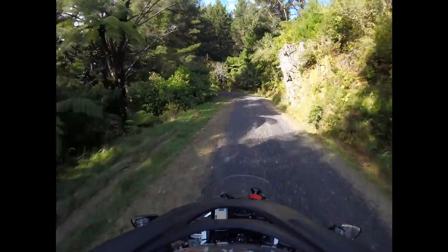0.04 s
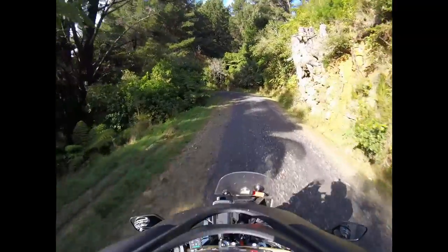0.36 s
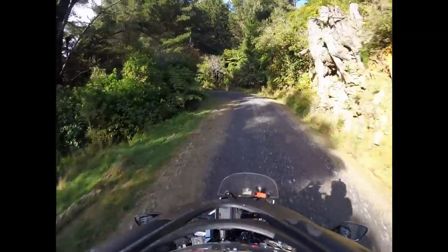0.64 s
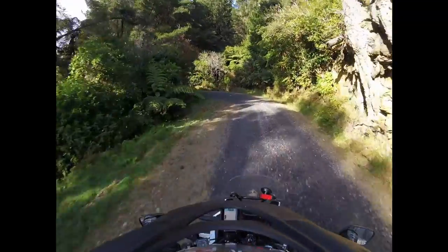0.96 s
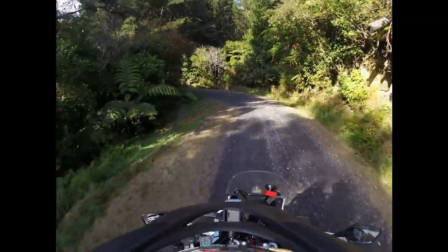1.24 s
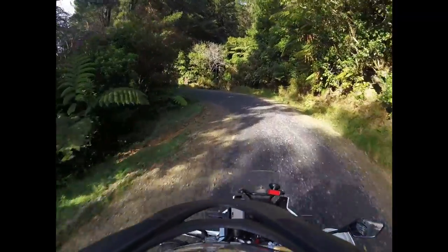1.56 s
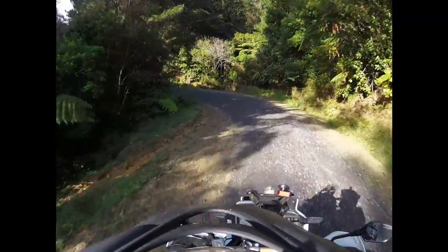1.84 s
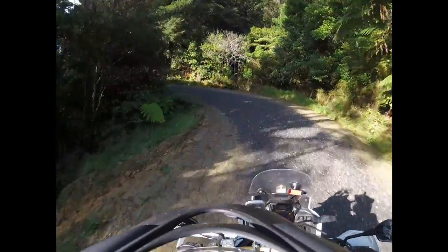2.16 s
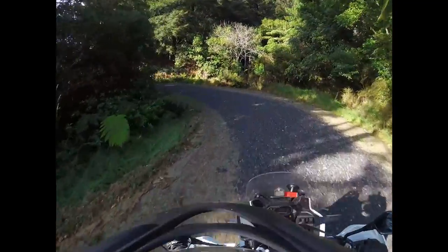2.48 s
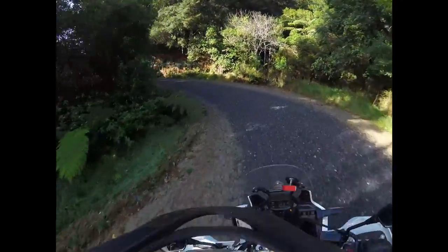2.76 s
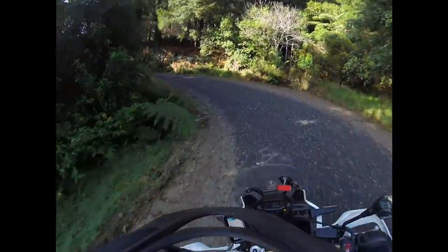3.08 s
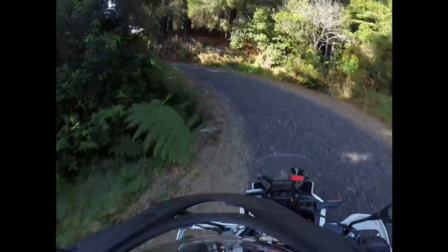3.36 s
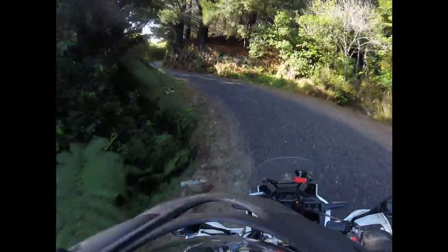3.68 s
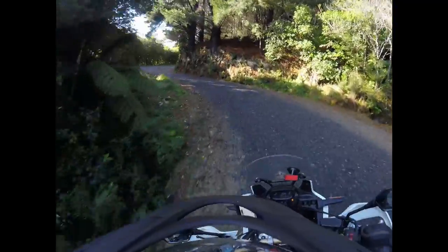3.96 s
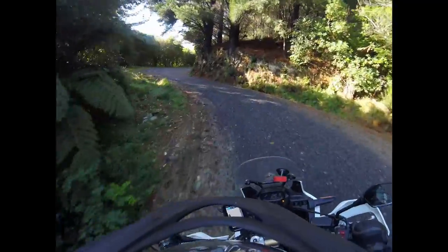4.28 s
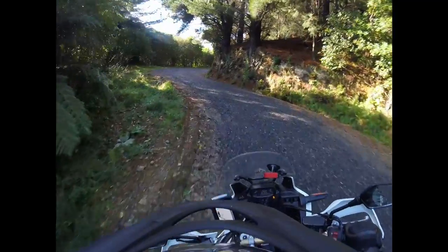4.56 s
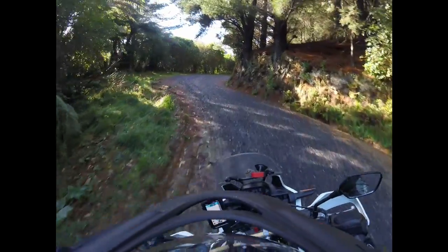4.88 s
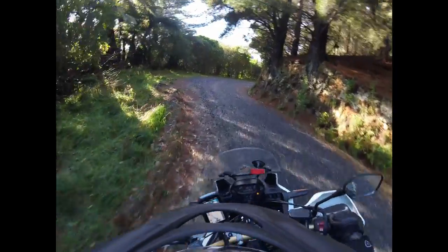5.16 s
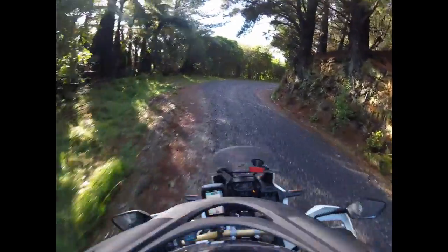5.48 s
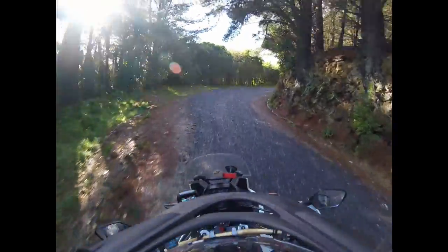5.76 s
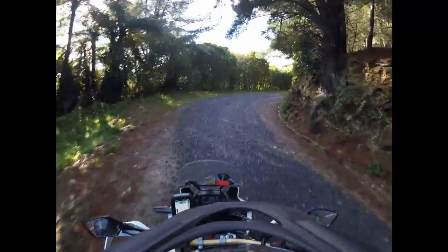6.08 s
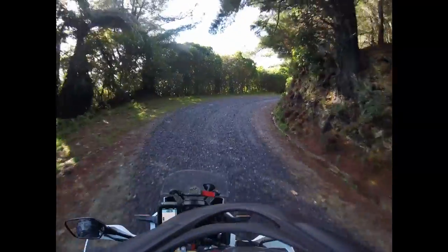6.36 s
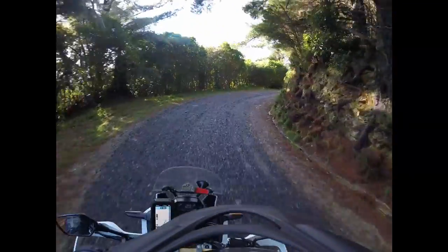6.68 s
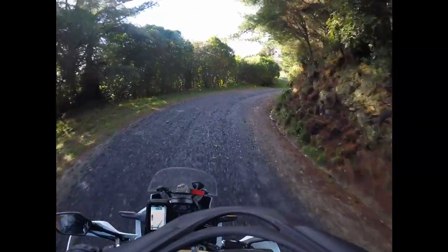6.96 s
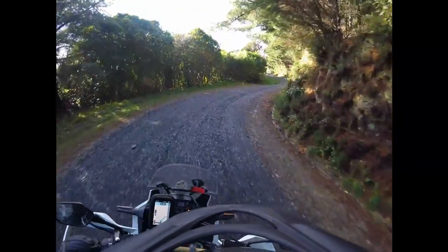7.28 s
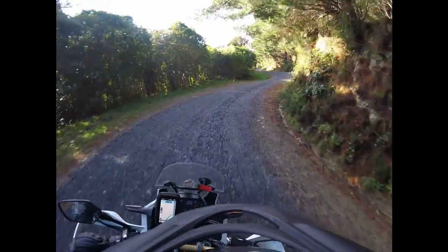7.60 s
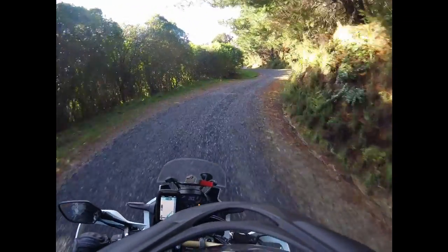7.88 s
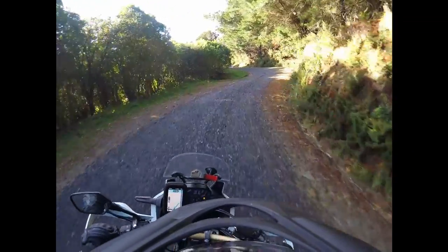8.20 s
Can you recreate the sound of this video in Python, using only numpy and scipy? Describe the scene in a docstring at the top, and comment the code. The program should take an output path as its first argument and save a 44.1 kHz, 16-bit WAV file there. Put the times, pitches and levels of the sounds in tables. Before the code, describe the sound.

A twin-cylinder motorcycle coasts along a gravel road, heard from the rider's seat, its low exhaust burbling as the revs sink under a faint gear whine. The throttle opens with a few dull chain slaps and the engine throbs and growls. The revs swell briefly as gravel sprays and stones ping off metal, then settle into a steady pull. Tyres crunch and wind rumbles on the microphone throughout.

```python
"""Motorcycle on a gravel bend

A V-twin coasts into a bend and pulls away, heard from the rider's seat. The exhaust burbles while
coasting; as the throttle opens the chain slaps, the airbox throbs and the intake hisses. Gears whine,
tyres crunch, stones ping, the chassis knocks now and then and wind buffets the microphone."""
import sys
import numpy as np
from scipy import signal
from scipy.fft import rfft, irfft
from scipy.io import wavfile
from scipy.ndimage import uniform_filter1d, minimum_filter1d

SR = 44100
rng = np.random.default_rng(int(sys.argv[2]) if len(sys.argv) > 2 else 0)


def generate_wav(sig):
    """Save sig (samples, or channels by samples) to the path in sys.argv[1] as 16-bit PCM at SR."""
    pcm = np.round(np.clip(np.atleast_2d(sig).T, -1, 1) * 32767).astype(np.int16)
    wavfile.write(sys.argv[1], SR, pcm)


N = 362943
TIME = np.arange(N) / SR
CRUISE_HZ = 16.3  # engine cycles per second; a cycle is two turns of the crank


# A level rule lists: dB with the throttle shut, half open and wide open, then dB added
# per doubling of cruising speed and dB added when the engine labours.
EXHAUST_RULE = (-12.5, -18, -34, 5.5, 1.5)
# The silencer's tone. Each row: frequency in Hz, relative level in dB.
SILENCER_TONE = [(10, -38.5), (24, -14), (34, 5), (49, 9.5), (65, 4.5), (82, 1), (100, -7.5), (128, -15.5),
                 (175, -28), (250, -32), (400, -38), (9000, -124)]
def exhaust():
    """Puffs of gas ring the silencer; this burble leads while the throttle is shut."""
    puffs = strokes(phase=0.375, second=0.64, uneven_db=1.2, jitter=0.0026, steady=True)
    return drive(EXHAUST_RULE) * with_crank(colour(puffs, SILENCER_TONE))


# Level rules for the four intake sounds, laid out like the exhaust's.
GULP_RULE = (-25.5, -11, -17.5, 6.5, -3)
SLAM_RULE = (-49.5, -28.5, -22.5, 1.5, 4.5)
RASP_RULE = (-45, -44.5, -11.5, -5, -0.5)
HISS_RULE = (-71.5, -44, -34.5, 9.5, 2.5)
# Their tones. Each row: frequency in Hz, relative level in dB.
AIRBOX_TONE = [(12, -26), (30, -8.5), (44, -9.5), (54, -7), (68, -1), (82, -3.5), (100, -4.5), (120, -8),
               (145, -24), (200, -18), (400, -49.5), (9000, -126)]
SNORKEL_TONE = [(50, -26.5), (115, -28), (150, -3.5), (178, 3), (200, 3.5), (228, -0.5), (270, -6),
                (315, -21), (400, -19.5), (700, -29.5), (2500, -58), (12000, -105)]
RASP_TONE = [(350, -22), (700, 6), (1050, 1), (1450, -1), (2000, -4.5), (4000, -18.5), (10000, -59)]
HISS_TONE = [(2500, -22.5), (4400, -17), (5000, -4), (5480, 1), (6050, -6.5), (6700, -6.5), (7600, -12),
             (9800, -12.5), (10600, -20), (11500, -33), (14300, -32), (15500, -40)]
def intake():
    """Gulps ring the airbox, shutting valves ring its inlet pipe, and air rushes past the throttle."""
    suction = -strokes(phase=0.343, second=1.05, uneven_db=0.7, jitter=0.0015)
    gulps = drive(GULP_RULE) * colour(suction, AIRBOX_TONE)
    closings = strokes(phase=0.42, second=1.44, uneven_db=3.0, jitter=0.0053, steady=True)
    slams = drive(SLAM_RULE) * with_crank(colour(closings, SNORKEL_TONE))
    rasp = drive(RASP_RULE) * colour(noise() * throb(phase=0.36, depth=3, second=2.24), RASP_TONE)
    air = colour(noise() + 0.5 * grit(per_s=2100, spread_db=4.0), HISS_TONE)
    hiss = drive(HISS_RULE) * air * throb(phase=0.29, depth=0.3)
    return gulps + slams + rasp + hiss


# The intake's bark. Each row: time in seconds, level in dB.
BARK_LEVELS = [(2.6, -36), (3.0, -18), (4.3, -24), (4.65, -16.5), (5.17, -16.5), (5.28, -26), (5.43, -17),
               (6.05, -23.5), (6.25, -28), (7.3, -26.5), (8.23, -23)]
def bark():
    """Under load each gulp starts with a rising whoop; the nearer cylinder's is much harder."""
    hits = strokes(phase=0.2845, second=3.9, uneven_db=1.0, jitter=0.0024, steady=True)
    whoops = glides(hits, from_hz=72, to_hz=376, length_s=0.01135, skew=0.76)
    return amp(curve(BARK_LEVELS)) * with_crank(whoops)


# The chug of the firings. Each row: time in seconds, level in dB.
CHUG_LEVELS = [(2.6, -45), (3.1, -30.5), (3.6, -36.5), (3.85, -28), (4.6, -32), (5.05, -22), (5.25, -43),
               (5.5, -33), (7.2, -42.5), (7.95, -28.5), (8.23, -50)]
def chug():
    """Each firing under load rings the engine with a short falling note."""
    hits = strokes(phase=0.115, second=0.68, uneven_db=2.5, jitter=0.0065)
    return amp(curve(CHUG_LEVELS)) * glides(hits, from_hz=559.7, to_hz=284, length_s=0.0226, skew=0.7)


# The growl's loudness. Each row: time in seconds, level in dB.
GROWL_LEVELS = [(2.5, -56), (3.0, -33.5), (3.9, -29.5), (5.1, -38), (5.9, -31), (7.1, -34), (7.98, -24),
                (8.23, -33.5)]
# Its tone. Each row: frequency in Hz, relative level in dB.
GROWL_TONE = [(100, -49), (200, -2), (250, -7), (290, -32), (343, 0), (360, 11), (385, -1), (440, -1.5),
              (485, -19.5), (560, -33), (1000, -51.8), (9000, -110.2)]
def growl():
    """Under throttle the firings make the bike ring at a few pitches."""
    hits = strokes(phase=0.1618, second=0.63, uneven_db=2, jitter=0.0063)
    return amp(curve(GROWL_LEVELS)) * colour(hits, GROWL_TONE)


# Level rule for the engine cases, laid out like the exhaust's.
CLATTER_RULE = (-34.5, -29, -24, 20.5, 4.5)
# Their tone. Each row: frequency in Hz, relative level in dB.
CASE_TONE = [(60, -21), (140, -12.5), (210, -10), (265, 4), (315, -5.5), (355, -2.5), (390, -4.5),
             (440, 1.5), (520, -4.5), (650, -14.5), (1200, -25), (1900, -31), (2800, -32.5), (5000, -45),
             (14000, -91)]
def clatter():
    """Firings and valve gear shake the engine cases, in deeper surges under load."""
    depth = 0.087 + 0.59 * throttle() + 0.62 * labouring()
    shaking = noise() * throb(phase=0.13, depth=depth, second=0.93)
    blows = unit(strokes(phase=0.14, second=0.3, uneven_db=1.5, jitter=0.0022))
    return drive(CLATTER_RULE) * colour(shaking + 0.16 * blows, CASE_TONE)


# Level rules for the tick and the rap, laid out like the exhaust's.
TICK_RULE = (-58.5, -56, -41, -5, 2)
RAP_RULE = (-68, -54.5, -36, -8, -21)
# Their tones. Each row: frequency in Hz, relative level in dB.
TICK_TONE = [(1200, -37), (1900, -14.5), (2180, -11.5), (2330, -4), (2500, -15), (2900, -17.5), (4000, -26),
             (9000, -50), (15000, -80)]
RAP_TONE = [(700, -24.5), (1700, -3), (2700, 3.5), (3800, -1), (6000, -11), (9000, -20.5), (14000, -52.5)]
def ticks(tick_s=0.0035, rap_s=0.0052):
    """Firing gives both cylinder heads a dry rap, and mainly one a metallic tick."""
    def rattle(hits, decay_s, tone):
        """A puff of noise dies away after each hit."""
        fades = signal.lfilter([1], [1, -np.exp(-1 / (decay_s * SR))], hits)
        return colour(fades * noise(), tone)
    tick = rattle(strokes(phase=0.15, second=0.39, uneven_db=4.5, jitter=0.0038), tick_s, TICK_TONE)
    rap = rattle(strokes(phase=0.12, second=1.0, uneven_db=3.0, jitter=0.0036), rap_s, RAP_TONE)
    return drive(TICK_RULE) * tick + drive(RAP_RULE) * rap


# Gear whine, strongest when coasting or cruising. Each row: time in seconds, level in dB.
WHINE_LEVELS = [(0, -45.5), (.8, -45.5), (0.98, -40.5), (1.35, -48), (1.62, -43.5), (2.2, -41), (2.42, -46),
                (4.2, -50), (5.65, -42), (5.9, -42.5), (6.3, -44), (7, -42), (8.23, -43.5)]
def whine(teeth_per_cycle=91, width_hz=110, overtone_db=-14):
    """Meshing gear teeth give a fuzzy whistle that follows engine speed."""
    mesh = 2 * np.pi * teeth_per_cycle * cycles()
    note = drift(width_hz) * np.cos(mesh) + drift(width_hz) * np.sin(mesh)
    overtone = drift(4 * width_hz) * np.cos(2 * mesh) + drift(4 * width_hz) * np.sin(2 * mesh)
    return amp(curve(WHINE_LEVELS)) * (note + amp(overtone_db) * overtone)


# Level rules for the tyres, laid out like the exhaust's.
ROAR_RULE = (-38, -37.5, -25, 15, 6)
CRUNCH_RULE = (-49.5, -53.5, -45, -0.5, 2)
# Their tones. Each row: frequency in Hz, relative level in dB.
ROAR_TONE = [(200, -11), (500, 6.5), (750, -2), (1100, -5.5), (1600, -5), (2300, -12), (4500, -24.5),
             (10000, -65.5), (15000, -75)]
CRUNCH_TONE = [(600, -9.5), (1500, -9), (2200, -5.5), (3200, -6.5), (4300, -12.5), (5800, -5), (7200, -10),
               (8500, -16.5), (10500, -26.5), (12000, -30), (15000, -42)]
# Loose gravel leaving the bend. Each row: time in seconds, change in crunch in dB.
LOOSE_GRAVEL = [(4.4, -2.5), (4.85, 9.5), (5.65, -5), (6.1, 9), (6.16, -5)]
def tyres(roar_clumps_db=1.0, crunch_clumps_db=0.2):
    """Rolling tyres roar and stones grind under the tread, more when the rear tyre digs in."""
    roar = colour(noise() + 0.4 * grit(per_s=790, spread_db=2.0), ROAR_TONE)
    crunch = colour(noise() + grit(per_s=2300, spread_db=0.5), CRUNCH_TONE)
    roar_gain = drive(ROAR_RULE) * amp(roar_clumps_db * drift(40))
    crunch_gain = drive(CRUNCH_RULE) * amp(curve(LOOSE_GRAVEL) + crunch_clumps_db * drift(58))
    return roar_gain * roar + crunch_gain * crunch


# Thrown gravel. Each row: start in seconds, level in dB.
GRAVEL_SPRAYS = [(4.824, -35.5), (5.035, -44), (5.101, -37), (5.358, -39), (6.759, -54)]
def sprays(rise_s=0.013):
    """The rear tyre throws gravel in short bursts that swell and die away."""
    t, bursts = np.arange(SR // 5) / SR, np.zeros(N)
    for start, db in GRAVEL_SPRAYS:
        add(bursts, start, amp(db) * t / rise_s * np.exp(1 - t / rise_s))
    return bursts * colour(noise(), CRUNCH_TONE)


# Short dull knocks. Each row: start in seconds, peak level in dB, ring in Hz.
KNOCKS = [(1.257, -10.5, 313), (2.665, -21, 650), (2.749, -14.5, 615), (2.838, -15.5, 577),
          (2.921, -14.5, 540), (2.988, -11.5, 470), (3.29, -18, 810), (3.557, -21, 700), (6.675, -9.5, 430),
          (6.761, -12, 720), (7.971, -16, 330)]
def knocks(decay_s=0.0074):
    """The chain slaps as the throttle opens; elsewhere the chassis gives a few single knocks."""
    t, out = np.arange(SR // 10) / SR, np.zeros(N)
    for start, db, hz in KNOCKS:
        tone = [(hz / 6, -15), (hz / 2, 0), (hz, 0), (hz * 2, -12), (hz * 5, -36), (hz * 20, -70)]
        knock = colour(noise(len(t)) * np.exp(-t / decay_s), tone)
        add(out, start, amp(db) * knock / abs(knock).max())
    return out


# Stone strikes. Each row: start in seconds, peak level in dB, ring in Hz.
STONE_HITS = [(0.313, -33, 4840), (0.7104, -30, 5230), (3.091, -37, 4640), (5.1023, -26.5, 6400),
              (5.1047, -16, 7160), (5.1795, -19, 6440)]
def stones(decay_s=0.0019):
    """Flung stones ping off metal."""
    t, out = np.arange(SR // 20) / SR, np.zeros(N)
    for start, db, hz in STONE_HITS:
        tone = [(hz / 2, -18), (hz, 0), (hz * 1.3, -6), (hz * 1.8, -34)]
        ping = colour(noise(len(t)) * np.exp(-t / decay_s), tone)
        add(out, start, amp(db) * ping / abs(ping).max())
    return out


# Gusts. Each row: time in seconds, level in dB.
GUSTS = [(0, -17), (2.5, -17), (3.2, -17), (4.3, -15.5), (4.7, -24), (5.65, -23), (6.1, -17), (6.35, -15),
         (6.55, -17), (7.4, -19.5), (8.23, -22)]
# The wind's tone. Each row: frequency in Hz, relative level in dB.
WIND_TONE = [(8, -23), (25, -2), (48, -3), (64, -4.5), (95, -4), (130, -8.5), (180, -13.5), (250, -14),
             (330, -29), (700, -45), (3000, -80.5), (14000, -110)]
def wind(waver_db=1.25):
    """Lumpy air pressure rumbles on the microphone."""
    return amp(curve(GUSTS) + waver_db * drift(1.26)) * colour(noise(), WIND_TONE)


# The rider coasts, opens up, lifts briefly, then cruises. Each row: time in seconds, opening 0 to 1.
THROTTLE_MOVES = [(2.55, 0), (3.02, 0.41), (3.5, 0.46), (3.85, 0.49), (4.65, 0.58), (5.12, 0.73),
                  (5.29, 0.5), (5.4, 0.65), (6.0, 0.55), (6.25, 0.47), (7.3, 0.5), (8.0, 0.58),
                  (8.23, 0.56)]
def throttle():
    """How far the throttle is open."""
    return np.clip(curve(THROTTLE_MOVES), 0, 1)


# Engine speed. Each row: time in seconds, cycles per second.
ENGINE_SPEED = [(0.0, 21.124), (0.76, 17.719), (1.01, 21.036), (1.69, 17.568), (2.36, 14.856),
                (2.86, 13.468), (2.99, 14.328), (3.22, 13.505), (4.45, 14.484), (4.76, 15.267),
                (5.01, 19.106), (5.26, 14.737), (5.44, 16.627), (5.64, 15.573), (5.73, 16.43),
                (6.18, 16.11), (7.37, 16.225), (8.23, 17.537)]
def cycles():
    """Engine cycles turned so far."""
    return np.cumsum(curve(ENGINE_SPEED)) / SR


def labouring(full_hz=14.05, free_hz=15.35):
    """0 when the engine spins freely, 1 when it labours at low speed."""
    return np.clip((free_hz - curve(ENGINE_SPEED)) / (free_hz - full_hz), 0, 1)


def drive(rule):
    """Turns a level rule into a gain that follows throttle and engine speed."""
    shut, half, wide, per_doubling, labour = rule
    throttle_db = np.interp(throttle(), [0, 0.5, 1], [shut, half, wide])
    speed_db = per_doubling * np.log2(curve(ENGINE_SPEED) / CRUISE_HZ)
    return amp(throttle_db + speed_db + labour * labouring())


def strokes(phase, second, uneven_db, jitter, steady=False, gap=0.368):
    """Two limping pulses a cycle, one per cylinder; steady holds the rhythm at cruising speed."""
    # phase, gap and jitter are shares of a cycle; second is the second cylinder's strength
    turned = TIME * CRUISE_HZ if steady else cycles()
    pulses = np.zeros(N)
    for offset, strength in ((phase, 1), (phase + gap, second)):
        slip, force = rng.standard_normal((160, 2)).T
        at = np.searchsorted(turned, np.arange(len(slip)) + offset + jitter * slip)
        pulses[at[at < N]] += strength * amp(uneven_db * force[at < N])
    return pulses / np.sqrt(curve(ENGINE_SPEED))


def throb(phase, depth, gap=0.34, second=1):
    """A gain that swells twice a cycle, once for each cylinder."""
    turned = cycles() - phase
    swell = np.cos(np.pi * turned) ** 20 + second * np.cos(np.pi * (turned - gap)) ** 20
    return unit(1 + depth * swell)


def with_crank(x):
    """Stretches a sound made at cruising speed so its pitch follows the engine."""
    return np.interp(cycles(), TIME * CRUISE_HZ, x)


def glides(hits, from_hz, to_hz, length_s, skew):
    """Each hit becomes a short sliding note; skew below 1 makes it peak earlier."""
    progress = np.arange(0, 1, 1 / (length_s * SR))
    hz = from_hz + (to_hz - from_hz) * progress
    note = np.sin(np.pi * progress ** skew) ** 2 * np.sin(2 * np.pi * np.cumsum(hz) / SR)
    return unit(signal.oaconvolve(hits, note)[:N])


def colour(x, tone, size=32768):
    """Filters a sound to a tone, so pulses ring after they strike; the result has strength 1."""
    hz, db = np.transpose(tone)
    log_hz = np.log(abs(np.fft.fftfreq(size, 1 / SR)) + 1)
    log_gain = np.log(amp(np.interp(log_hz, np.log(hz), db)))
    response = np.exp(np.conj(signal.hilbert(log_gain)))
    ring = np.fft.ifft(response).real[:size // 4]
    return unit(signal.oaconvolve(x, ring)[:len(x)])


def noise(length=N):
    """Plain white noise."""
    return rng.standard_normal(length)


def grit(per_s, spread_db):
    """Random clicks, most small and a few large."""
    clicks = (rng.random(N) < per_s / SR) * rng.choice([-1, 1], N)
    return unit(clicks * amp(spread_db * np.minimum(rng.exponential(1, N), 4)))


def drift(hz):
    """Random wandering, up to about the given rate."""
    keep_slow = np.exp(-(np.fft.rfftfreq(N, 1 / SR) / hz) ** 2)
    return unit(irfft(rfft(noise()) * keep_slow, N))


def amp(db):
    """Decibels to gain."""
    return 10 ** (np.asarray(db) / 20)


def unit(x):
    """Scales to an average strength (rms) of 1."""
    return x / np.sqrt(np.mean(x ** 2) + 1e-20)


def curve(rows):
    """A time table's value at every sample."""
    return np.interp(TIME, *np.transpose(rows))


def add(mix, start_s, sound):
    """Mixes a sound in at its start time."""
    part = mix[max(round(start_s * SR), 0):][:len(sound)]
    part += sound[:len(part)]


def scene():
    """Engine, road and wind travel with the rider in open air, in one channel."""
    engine = exhaust() + intake() + bark() + chug() + growl() + clatter() + ticks() + whine()
    road = tyres() + sprays() + knocks() + stones()
    return (engine + road + wind())[None]


def record(dry, threshold=0.67, squeeze=0.74, top_hz=15200):
    """A quick, soft limiter holds down the peaks, then the highest treble is cut."""
    span = SR // 100
    gain = minimum_filter1d(threshold / np.maximum(abs(dry), threshold), span) ** squeeze
    limited = dry * uniform_filter1d(gain, span)
    treble_cut = signal.firwin(511, top_hz, window=("kaiser", 9), fs=SR)
    return signal.oaconvolve(limited, treble_cut[None], "same")


dry = scene()
out = record(dry)
generate_wav(out)
```